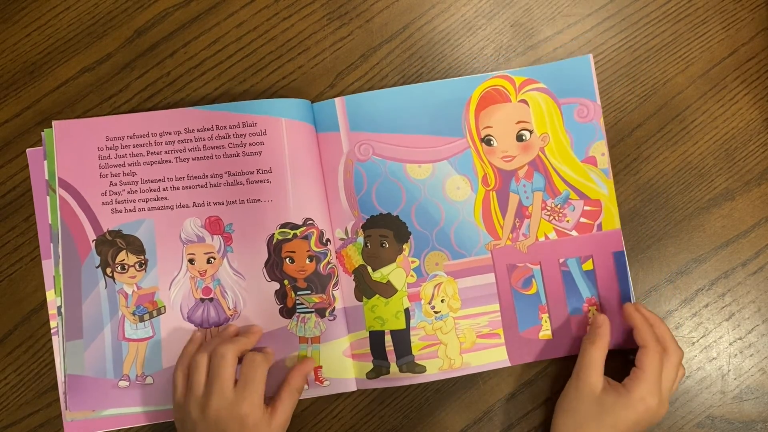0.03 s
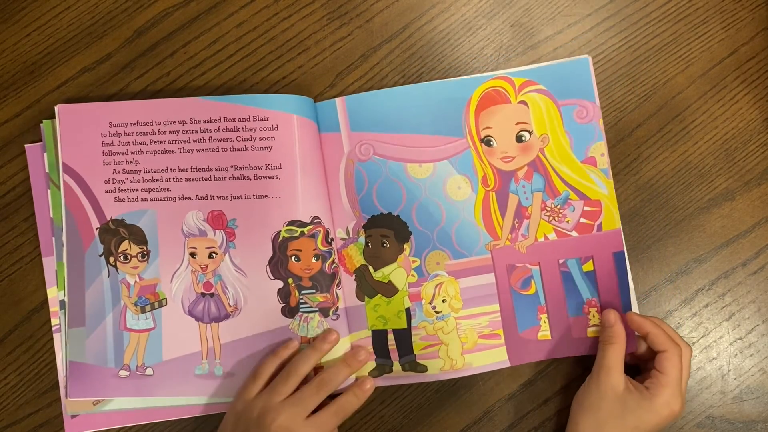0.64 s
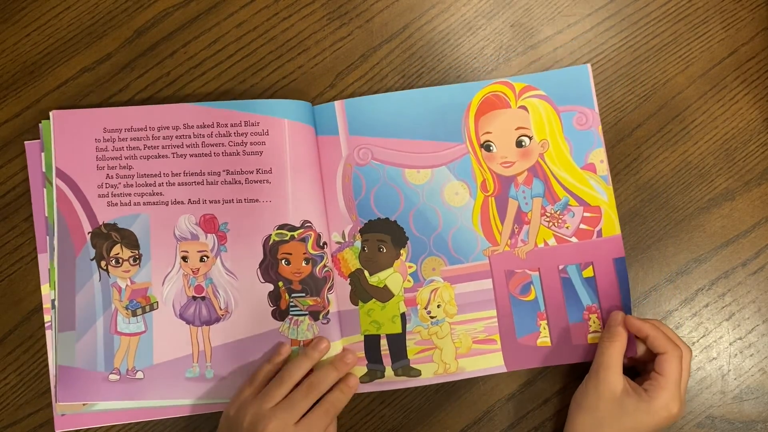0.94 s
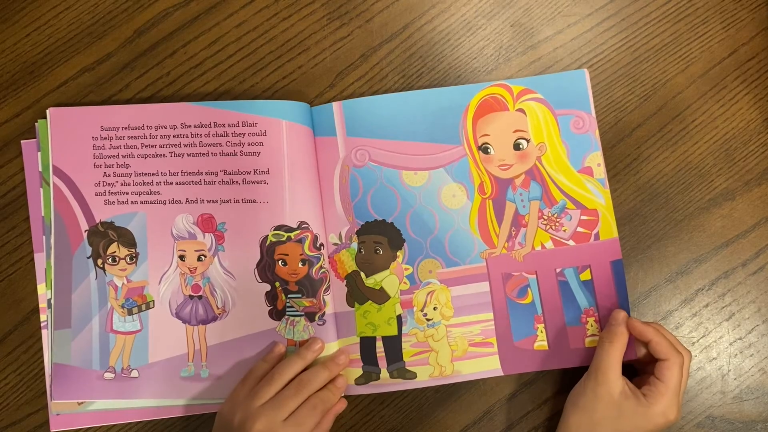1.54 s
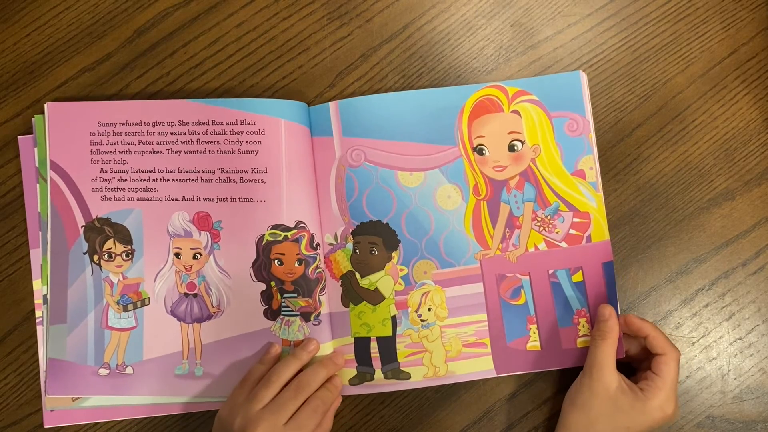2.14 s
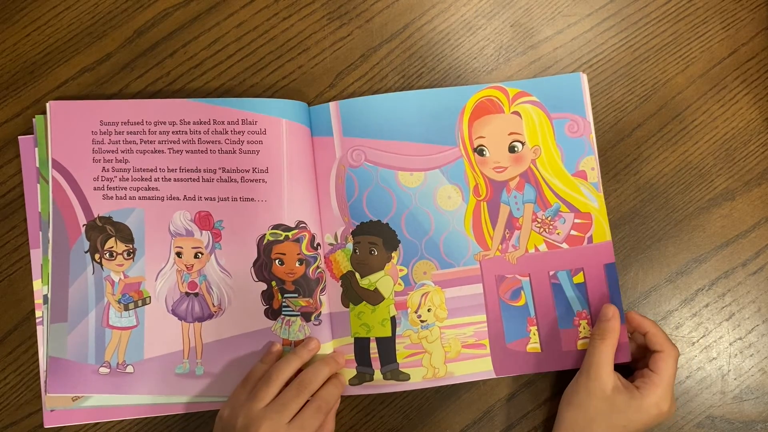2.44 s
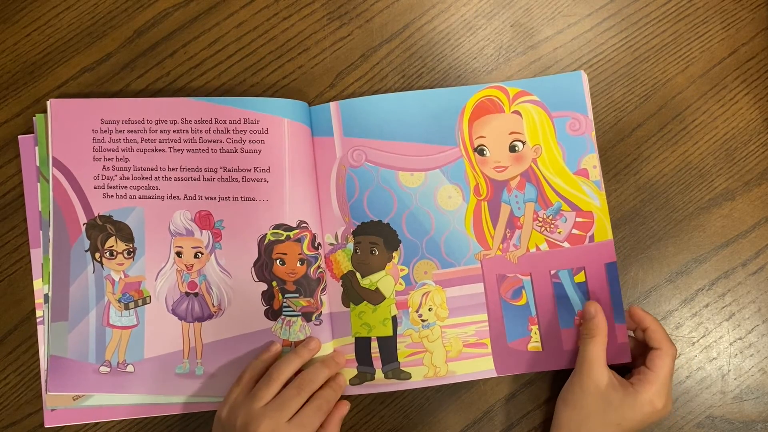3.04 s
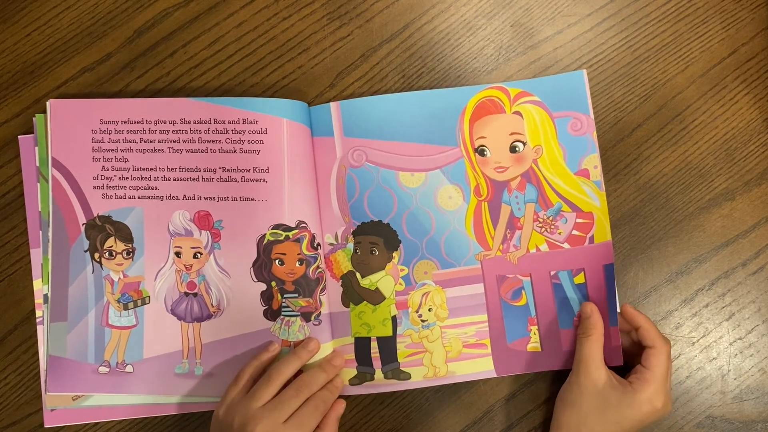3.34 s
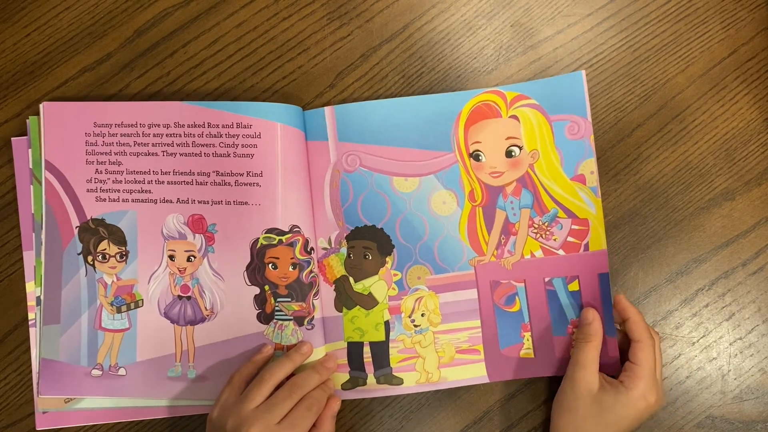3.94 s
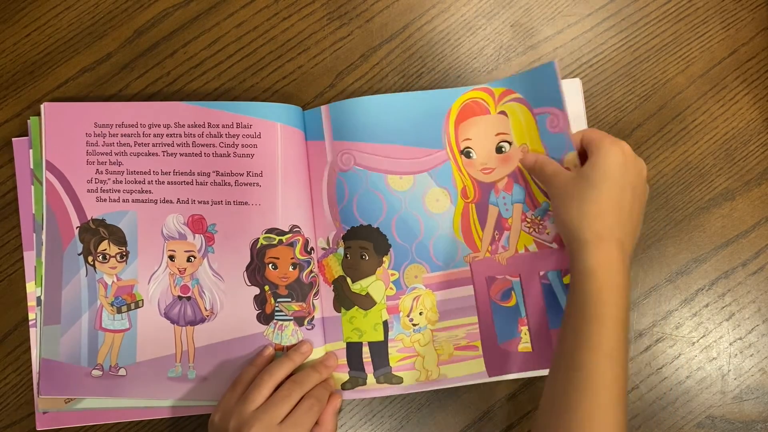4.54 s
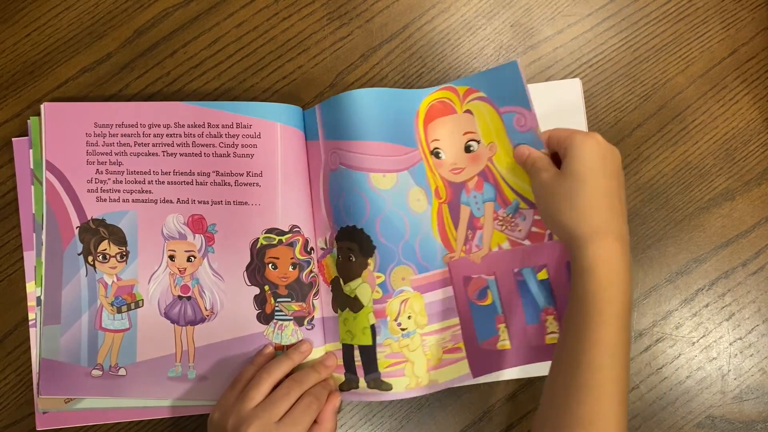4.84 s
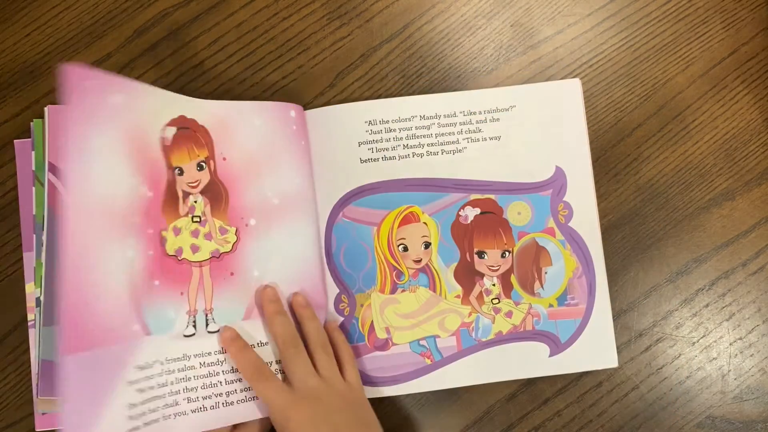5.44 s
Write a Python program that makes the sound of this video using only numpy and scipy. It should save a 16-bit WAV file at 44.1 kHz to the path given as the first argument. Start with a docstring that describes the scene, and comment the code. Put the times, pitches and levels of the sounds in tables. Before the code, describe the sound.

Close to the microphone, fingertips rub lightly on a picture book page and pick at its edge, making faint, scattered ticks and a soft bump. Then paper slides on paper in short hissing pushes, and the stiff sheet crackles, bends and lands with a louder flap and a brief rub. A low, steady indoor hum lies underneath.

```python
"""A quiet, humming room, with a stereo camera close above a picture book on a wooden table.
Fingers brush the stiff page and catch on its corner in tiny stick-slip ticks. The hand slides under
the sheet, paper hissing on paper; the page snaps and buckles as it is lifted, flaps over and is
smoothed down. The microphones hear it directly, off the table and book, and faintly off the walls."""
import sys
import numpy as np
from scipy import signal
from scipy.fft import rfft, irfft, next_fast_len
from scipy.io import wavfile
from scipy.ndimage import uniform_filter1d, map_coordinates

SR = 44100
rng = np.random.default_rng(int(sys.argv[2]) if len(sys.argv) > 2 else 0)


def unload_wav(signal):
    """Save mono or channel-first audio to the path in sys.argv[1] as 16-bit WAV at rate SR, clipped to [-1, 1]."""
    wavfile.write(
        sys.argv[1],
        SR,
        np.round(np.clip(np.atleast_2d(signal).T, -1, 1) * 32767).astype(np.int16),
    )


N = 246997
T = np.arange(N) / SR
SHORT = T[:SR // 3]  # time axis of one brief sound


def amp(db):
    """Decibels to gain."""
    return 10 ** (np.asarray(db) / 20)


def unit(x):
    """Scale to rms 1."""
    return x / np.sqrt(np.mean(x ** 2) + 1e-20)


def along(points, hz):
    """Read (Hz, value) points on a log axis."""
    f, v = np.transpose(points)
    return np.interp(np.log(hz + 1), np.log(f), v)


def rolloff(ratio, slope=1):
    """A gain near 1 for small ratios, 3 dB down at ratio 1 and falling beyond."""
    return 1 / np.hypot(1, ratio ** slope)


def filtered(x, response):
    """x times a response of frequency."""
    n = x.shape[-1]
    m = next_fast_len(n + 8192)
    return irfft(rfft(x, m) * response(np.fft.rfftfreq(m, 1 / SR)), m)[..., :n]


def coloured(x, spectrum):
    """x shaped by (Hz, dB) points, at rms 1."""
    return unit(filtered(x, lambda hz: amp(along(spectrum, hz))))


def ring(gain, size=2048):
    """The causal impulse response, of energy 1, with this shape over frequency."""
    cepstrum = irfft(np.log(gain(np.fft.rfftfreq(size, 1 / SR)) + 1e-6))
    cepstrum[1:size // 2] *= 2
    cepstrum[size // 2 + 1:] = 0
    impulse = irfft(np.exp(rfft(cepstrum)))
    return impulse / np.linalg.norm(impulse)


def add(track, s, sound):
    """Mix a sound into the track at time s."""
    part = track[max(round(s * SR), 0):][:len(sound)]
    part += sound[:len(part)]


def wobble(rate):
    """A slow random curve, rate knots a second."""
    knots = rng.standard_normal(int(T[-1] * rate) + 2)
    return np.interp(T * rate, np.arange(len(knots)), knots)


def swell(s, rise, hold, fall):
    """A movement speeds up from rest at time s, holds and slows to rest: 0 to 1."""
    return np.interp(T, s + np.cumsum([0, rise, hold, fall]), [0, 1, 1, 0])


def grains(n, rate, spread_db):
    """Fibres that let go at random moments with random strengths, rms 1."""
    count = int(n * rate / SR) + 1
    when, size, side = rng.random((count, 3)).T
    strength = np.sign(side - .5) * amp(spread_db * np.sqrt(12) * size)
    return unit(np.bincount((when * n).astype(int), strength, n))


def patchy(x, depth_db):
    """The sheet keeps changing shape, so its resonances come and go."""
    spectra = signal.stft(x, nperseg=256)[2]
    field = uniform_filter1d(rng.standard_normal(spectra.shape), size=4, axis=0)
    field = unit(uniform_filter1d(field, size=14, axis=1))
    return unit(signal.istft(spectra * amp(depth_db * field), nperseg=256)[1][:len(x)])


def uneven(hz, spacing_hz, depth_db):
    """Random peaks and dips over frequency: paper held a little differently rings differently."""
    return amp(depth_db * map_coordinates(rng.standard_normal(256), [hz / spacing_hz], mode="mirror"))


# Room tone all around the camera. Each row: frequency in Hz, relative level in dB.
ROOM_TONE = [(25, -51), (40, -21), (62, -1.5), (100, -4.5), (135, 8.5), (200, 0.5), (340, 7), (450, 0.5),
             (650, -5.5), (1100, -6.5), (1290, -3.5), (1600, -11), (3000, -17.5), (5500, -25.5),
             (8000, -43.5), (13000, -47)]
# How alike that tone is at the two microphones. Each row: frequency in Hz, left-right correlation.
ROOM_LIKENESS = [(130, 0.99), (270, 0.88), (580, 0.045), (3000, 0.12)]
# An appliance in the room, heard dead centre. Each row: frequency in Hz, level in dB before hum_db.
APPLIANCE_HUM = [(118.4, -71.5), (172.3, -84), (258.4, -77), (360.7, -69), (473.7, -80), (952.8, -84),
                 (1280, -76)]
def room(motion, rest_db=-64.5, swell_db=1, hum_db=-1):
    """Low room noise that swells while the hands move, and a slightly unsteady hum."""
    width = lambda hz: np.tan(np.arccos(np.clip(along(ROOM_LIKENESS, hz), -1, 1)) / 2)
    mid, side = coloured(rng.standard_normal((2, N)), ROOM_TONE)
    side = filtered(side, width)
    air = np.hypot(amp(rest_db), amp(swell_db) * motion) * np.array([mid + side, mid - side])
    drift = lambda: .55 * wobble(4) + 2 * np.pi * rng.random()
    hum = sum(amp(db) * np.sqrt(2) * np.sin(2 * np.pi * hz * T + drift()) for hz, db in APPLIANCE_HUM)
    return air + amp(hum_db) * hum


def table_boom(motion, ring_hz=140, width_hz=7, gain_db=-9):
    """The table booms softly in one low mode under the moving hands."""
    boom = filtered(rng.standard_normal(N), lambda hz: 1 / (1 + ((hz - ring_hz) / width_hz) ** 2))
    return amp(gain_db) * motion * unit(boom)


def echoes(x, t60_of, length):
    """Diffuse reflections at each microphone, each frequency dying at its own speed."""
    hz, t, spectra = signal.stft(rng.standard_normal((2, length)), SR, nperseg=128)
    tail = signal.istft(spectra * amp(-60 * t / t60_of(hz)[:, None]), SR, nperseg=128)[1]
    tail /= np.linalg.norm(tail, axis=1, keepdims=True)
    tail = np.pad(tail, ((0, 0), (SR // 1000, 0)))  # 1 ms behind the direct sound
    return signal.oaconvolve(x[None], tail, axes=1)[:, :N]


# The book, close below the two microphones. Each row: frequency in Hz, left's lead in radians.
MIC_PHASE = [(300, 0), (950, -1.6), (1800, 0), (2900, 2.2), (3900, .8), (5200, .3), (7000, 3), (7900, 3.3),
             (10000, 6.2), (11200, 6.5), (13000, 9.3)]
# Its place in the stereo picture. Each row: frequency in Hz, left minus right in dB.
MIC_BALANCE = [(350, 1), (600, -6), (1140, -10), (2050, -2), (3700, -2), (6000, 0)]
# Tone of the near and far reflections as picked up, with a dip near 7 kHz.
# Each row: frequency in Hz, gain in dB.
NEAR_COLOUR = [(200, -30), (450, 4), (900, 4), (2800, -1.5), (5000, 0), (7000, -19), (12000, 1)]
FAR_COLOUR = [(150, 12), (450, -5), (1500, 7), (5300, 3), (7000, -34), (12000, -10)]
# The room's short decay. Each row: frequency in Hz, time to fall 60 dB (t60) in seconds.
WALL_DECAY = [(200, 0.13), (1500, 0.16), (5000, 0.2), (12000, 0.12)]
def at_microphones(x, scatter_db, walls_db=-13, near_t60=.035):
    """Paper sound in stereo: direct, scattered by table and book, and returned by the walls."""
    half = np.array([[.5], [-.5]])
    direct = filtered(x, lambda hz: np.exp(1j * half * along(MIC_PHASE, hz)))
    scattered = amp(scatter_db) * filtered(x, lambda hz: amp(along(NEAR_COLOUR, hz)))
    pose = 2 * np.pi * 4 * T  # hand and page keep moving, so the short paths keep changing
    near = sum(echoes(scattered * share, lambda hz: np.full(len(hz), near_t60), SR // 20)
               for share in (np.cos(pose), np.sin(pose)))
    far = filtered(x, lambda hz: amp(along(FAR_COLOUR, hz)))
    far = amp(walls_db) * echoes(far, lambda hz: along(WALL_DECAY, hz), SR // 2)
    return filtered(direct + near + far, lambda hz: amp(half * along(MIC_BALANCE, hz)))


# Rubbed paper from close up: its hiss, the fizz on top and the body of the sheet below.
# Each row: frequency in Hz, relative level in dB.
PAPER_HISS = [(800, -34), (2000, -18), (3000, -3), (4200, -2), (5700, 4), (7000, -0.5), (8500, -3),
              (9900, -18.5), (11000, -53), (14000, -58)]
PAPER_FIZZ = [(5000, -20), (7000, -6), (8500, 8), (9900, 2), (11000, -5), (12300, -10.5), (14000, -7.5)]
PAPER_BODY = [(150, -74), (350, -6.5), (650, -15), (1200, -13), (1700, -0.5), (2150, 5), (2800, 2.5),
              (4500, -17), (9000, -57)]
FIZZ_GROWS = 1.48  # dB for each dB of hiss: faster sliding is brighter
def friction(hiss, fizz, body, rate, spread_db, flutter_db):
    """Sliding paper: dense fibre grains hiss and shake the sheet, under an uneven pressure."""
    pressure = amp(flutter_db * (wobble(70) + wobble(25)))
    rub = lambda spectrum: coloured(patchy(grains(N, rate, spread_db), depth_db=3.5), spectrum)
    return pressure * (hiss * rub(PAPER_HISS) + fizz * rub(PAPER_FIZZ) + body * rub(PAPER_BODY))


# Hands shifting on the book. Each row: start in seconds, hold in seconds, strength in dB.
HAND_SHIFTS = [(-.12, 0.12, -60), (0.252, 0.46, -58.3), (2.29, 0.023, -59), (3.374, 0.3, -66.5),
               (3.748, 1.7, -57.5)]
def hand_motion(rise_s=0.13, fall_s=0.33):
    """The strength of all shifts of the hands, summed in power, as a gain."""
    return np.sqrt(sum((amp(db) * swell(s, rise_s, hold, fall_s)) ** 2 for s, hold, db in HAND_SHIFTS))


def hand_rub(motion, hiss_db=-73, fizz_db=-84, body_db=-73):
    """Shifting hands rub the open page faintly; only the firmest shifts are bright."""
    drive = motion / motion.max()
    return friction(amp(hiss_db) * drive, amp(fizz_db) * drive ** FIZZ_GROWS, amp(body_db) * drive,
                    rate=6000, spread_db=10, flutter_db=3.5)


# The page's free corner, faint even this close.
# Each row: start in seconds, level in dB, pitch in Hz, t60 in seconds.
CORNER_TWANGS = [(2.272, -49, 2710, 0.052), (2.966, -60, 2030, 0.15), (3.421, -52, 2144, 0.098),
                 (3.469, -49, 2310, 0.083)]
def corner_twangs(attack_s=0.0023, waver_rad=0.71):
    """Let go, the corner springs back and rings with one short, slightly unsteady note."""
    track = np.zeros(N)
    for s, db, hz, t60 in CORNER_TWANGS:
        phase = 2 * np.pi * hz * SHORT + waver_rad * wobble(300)[:len(SHORT)]
        envelope = amp(db - 60 * SHORT / t60) * (1 - np.exp(-SHORT / attack_s))
        add(track, s, envelope * np.sin(phase))
    return track


# The stiff sheet as it flexes. Each row: frequency in Hz, relative level in dB.
SHEET_COLOUR = [(80, -7), (300, 8), (640, 5.5), (1150, 5), (1600, 4.5), (2500, 9.5), (6000, 11.5),
                (12000, 16)]
def shudder(t60, bright_hz, ring_hz, q, rate=2000, snap_db=16, soft_s=0.31):
    """The sheet snaps through, then shudders in smaller snaps."""
    mode = lambda r: r ** 2 / np.hypot(1 - r ** 2, r / q)  # a bend radiates little below its own ring
    bend = ring(lambda hz: amp(along(SHEET_COLOUR, hz)) * mode(hz / ring_hz) * rolloff(hz / bright_hz, 3))
    fade = amp(-60 * SHORT / t60)
    sound = signal.fftconvolve(grains(len(SHORT), rate, spread_db=2) * fade, bend)
    sound *= np.linalg.norm(fade) / np.linalg.norm(sound)  # the shudder releases a set energy
    sound[:len(bend)] += amp(snap_db) / (1 + t60 / soft_s) * bend  # a slow, soft bend has little snap
    return sound


# A finger bumps the hollow book. Each row: start in seconds, level in dB, t60 in seconds, resonance Q.
FINGER_BUMPS = [(1.058, -61, 0.21, 2.2), (1.835, -62, 0.39, 2.2), (3.43, -57.5, 0.24, 5.2),
                (3.449, -47, 0.18, 7)]
def finger_bumps(cover_db=-8.5):
    """The arched page answers each bump with a hollow note, the cover board with a woody one above."""
    track = np.zeros(N)
    for s, db, t60, q in FINGER_BUMPS:
        page = shudder(t60, bright_hz=900, ring_hz=865, q=q, snap_db=27.5)
        cover = shudder(t60, bright_hz=2320, ring_hz=2220, q=q)
        add(track, s, amp(db) * (page + amp(cover_db) * cover))
    return track


# The bright colour of the fingertip ticks as the microphones hear them.
# Each row: frequency in Hz, relative level in dB.
TICK_COLOUR = [(400, -31), (1500, -14), (2600, -3), (3100, -12), (3800, 4), (4300, 1.5), (5400, 15),
               (6800, 2), (8600, 5.5), (9500, -25), (13000, -33)]
# A fingertip catches on the page edge, just under the microphones.
# Each row: start in seconds, level in dB, length in seconds, pitch in Hz.
EDGE_TICKS = [(0.359, -47.5, 0.0071, 5270), (0.376, -45.5, 0.011, 5200), (0.921, -58.5, 0.006, 5470),
              (1.423, -51, 0.012, 5730), (1.931, -54, 0.0077, 5570), (2.1442, -47.5, 0.0087, 5240),
              (2.1922, -43, 0.0074, 4800), (2.269, -42, 0.013, 4900), (2.33, -43, 0.012, 5150),
              (2.375, -44, 0.013, 4830), (2.393, -47.5, 0.025, 4760), (2.965, -49, 0.033, 5600),
              (3.85, -46.5, .008, 4400)]
def edge_ticks(slip_rate=620, width_hz=1900, trail_db=-20, trail_t60=0.28, count=40):
    """The fingertip sticks and slips in a nearly regular, fading train; no two slips sound alike."""
    track = np.zeros(N)
    for s, db, length, pitch_hz in EDGE_TICKS:
        gaps = rng.uniform(1.0, 1.7, count) / slip_rate
        when = np.cumsum(gaps) - gaps[0]
        grip = amp(-4 * when / length) * np.clip(1 + (length - when) * slip_rate / 2, 0, 1) ** 2
        trail = amp(trail_db - 60 * when / trail_t60)
        sizes = amp(2.4 * rng.standard_normal(count)) * np.maximum(grip, trail) * np.sqrt(SR / slip_rate)
        colour = lambda hz: amp(along(TICK_COLOUR, hz)) * rolloff(2 * (hz - pitch_hz) / width_hz)
        held = ring(lambda hz: uneven(hz, spacing_hz=258, depth_db=4), size=512)  # each catch grips anew
        for delay, size in zip(when, sizes):
            tick = ring(lambda hz: colour(hz) * uneven(hz, spacing_hz=387, depth_db=4), size=512)
            slip = np.convolve(tick, held)
            add(track, s + delay, amp(db) * size * slip / np.linalg.norm(slip))
    return track


# Skin on coated paper. Each row: frequency in Hz, relative level in dB.
SKIN_COLOUR = [(800, -53), (2000, -20), (3000, -1), (4200, -6.5), (5700, 0.5), (7000, -0.5), (9000, -0.5),
               (10500, -21), (12000, -22), (14000, -28)]
# Short brushes across the page, heard close. Each row: start in seconds, level in dB, rise and t60
# in seconds, sheet gain in dB, treble cutoff in Hz, pitch in Hz.
FINGER_BRUSHES = [(.102, -57.5, .0038, 0.15, -20, 11400, 6400),
                  (0.391, -42, 0.0017, 0.063, -28, 12600, 5100), (.44, -50, 0.013, 0.43, -29, 8450, 4370),
                  (.48, -42.5, 0.031, 0.23, -14, 11900, 4040), (.575, -43.5, 0.021, 0.1, -11, 9900, 3530),
                  (.641, -58.5, 0.002, 0.03, 0, 12000, 5300), (.734, -56, 0.014, 0.087, -4.5, 9500, 5100),
                  (0.819, -60.5, 0.0069, 0.17, -22, 12000, 9050),
                  (1.043, -63.5, 0.0027, 0.25, -6, 9400, 5230), (1.819, -46, 0.023, 0.091, -13, 9700, 5160),
                  (2.815, -75, .012, .12, 1, 10500, 5500), (3.419, -48.5, 0.006, 0.31, -7, 8850, 5150),
                  (3.703, -57.5, .003, 0.11, -10, 7000, 5170), (3.717, -54.5, .003, 0.072, -9, 11500, 5200),
                  (3.728, -46, 0.024, 0.31, -7, 10000, 4700), (3.972, -55, 0.0091, 0.18, -10, 10000, 8650),
                  (4.576, -39.5, 0.0039, 0.11, -10.5, 11700, 5370),
                  (4.989, -33.5, 0.011, 0.13, -15, 12000, 5700),
                  (5.246, -47.5, 0.0022, 0.19, 0.5, 12000, 5100),
                  (5.376, -36, 0.007, .05, -13.5, 12000, 6200)]
def finger_brushes(width_hz=700, focus=3.4):
    """A quick stroke swells and dies away, with its own share of the sheet's lower rustle."""
    track, n = np.zeros(N), len(SHORT)
    for s, db, rise, t60, sheet_db, bright_hz, pitch_hz in FINGER_BRUSHES:
        peak = lambda hz: 1 + focus * rolloff((hz - pitch_hz) / width_hz)
        stroke = np.minimum(SHORT / rise, 1) * amp(-60 * np.maximum(SHORT - rise, 0) / t60)
        skin = coloured(patchy(grains(n, rate=3000, spread_db=-1), depth_db=4.5), SKIN_COLOUR)
        skin = unit(filtered(skin, lambda hz: peak(hz) * rolloff(hz / bright_hz, 10)))
        sheet = coloured(patchy(grains(n, rate=2500, spread_db=2), depth_db=5.5), PAPER_BODY)
        # a fingertip is too small to drive the long bends
        sheet = filtered(sheet, lambda hz: rolloff(800 / (hz + 1), 2))
        add(track, s, amp(db) * stroke * (skin + amp(sheet_db) * sheet))
    return track


# A finger runs along the page edge, which sings thinly or rasps. Each row: start and length
# in seconds, level in dB, then first pitch, last pitch and width in Hz.
EDGE_GLIDES = [(0.257, 0.23, -57.5, 6240, 5030, 460), (0.419, .15, -61, 4515, 3300, 500),
               (0.465, 0.068, -55, 9800, 10540, 420), (3.436, 0.07, -58.5, 5400, 5220, 400),
               (3.481, 0.75, -67, 5190, 5210, 170), (3.597, 0.34, -67, 4430, 4090, 170),
               (3.697, .26, -54.5, 5250, 5340, 300), (3.758, .13, -56, 4030, 4300, 450),
               (3.959, 0.15, -49, 5450, 5010, 450), (4.306, 0.11, -43, 4200, 3700, 700),
               (4.584, 0.115, -63, 5280, 5150, 200), (4.625, 0.13, -52, 5000, 5110, 240),
               (4.797, 0.13, -37, 5740, 5840, 595), (5.088, 0.073, -46, 5920, 5880, 430),
               (5.41, 0.12, -43, 5580, 5660, 526)]
def edge_glides(rough_db=2.5):
    """The page edge sings in one scratchy resonance that swells, fades and moves with the finger."""
    track = np.zeros(N)
    for s, length, db, first_hz, last_hz, width_hz in EDGE_GLIDES:
        noise = filtered(rng.standard_normal((2, SR)), lambda hz: 1 / (1 + (hz / width_hz) ** 2))
        grip = amp(rough_db * unit(uniform_filter1d(rng.standard_normal(SR), size=200)))
        phase = 2 * np.pi * np.cumsum(np.interp(T[:SR], [0, length], [first_hz, last_hz])) / SR
        resonance = noise[0] * np.cos(phase) + noise[1] * np.sin(phase)
        stroke = swell(0, length / 3, length / 3, length / 3)[:SR]
        add(track, s, amp(db) * stroke * unit(grip * resonance))
    return track


# One paper fibre cracking. Each row: frequency in Hz, relative level in dB.
FIBRE_COLOUR = [(600, -41), (1800, 8), (4000, -15), (6500, 24), (10000, -32), (13000, -49)]
def crinkles(hiss, crinkle_db=-12):
    """Single fibres crack in the bending sheet, harder as it slides faster."""
    cracks = grains(N, rate=45, spread_db=4)
    fibre = ring(lambda hz: amp(along(FIBRE_COLOUR, hz)))
    return hiss * amp(crinkle_db) * signal.fftconvolve(cracks, fibre)[:N]


# Close under the camera the hand pushes in jerks beneath the page, grips, lifts, swings and smooths it.
# Each row: start, rise, hold and fall in seconds, hiss level in dB, then sheet and fizz in dB against it.
PAGE_SLIDES = [(3.981, 0.095, 0.026, .06, -39.5, -15.5, -19), (4.088, 0.054, 0.026, 0.043, -40.5, -9.5, -9),
               (4.161, 0.039, 0.027, .05, -38, -10.5, -13), (4.223, 0.048, .04, 0.059, -40, -20, -11),
               (4.287, 0.036, 0.038, 0.079, -39.5, -8.5, -10), (4.385, 0.062, 0.059, 0.024, -43, -4.5, -10),
               (4.504, 0.042, 0.057, 0.049, -53, -4, -26), (4.677, 0.03, 0.083, 0.072, -47, 1, -12),
               (4.771, 0.021, 0.11, 0.023, -40.5, -5.5, -6), (4.913, 0.086, 0.016, 0.058, -39, -4.5, 0),
               (5.033, 0.04, 0.044, 0.073, -42.5, -6.5, -10),
               (5.219, 0.081, 0.089, 0.058, -40.5, -10.5, -5.5), (5.388, 0.057, 0.13, .1, -42, -11.5, -4.5)]
def page_slides(speed_power=1.1):
    """Paper slides on paper; its speed drives the hiss, fizz, sheet sound and crinkles."""
    hiss, fizz, body = np.zeros((3, N))
    for s, rise, hold, fall, db, sheet_db, fizz_db in PAGE_SLIDES:
        drive = swell(s, rise, hold, fall) ** speed_power
        hiss += amp(db) * drive
        fizz += amp(db + fizz_db) * drive ** FIZZ_GROWS
        body += amp(db + sheet_db) * drive
    return friction(hiss, fizz, body, rate=4000, spread_db=2, flutter_db=.9) + crinkles(hiss)


# The page buckling below the microphones.
# Each row: start in seconds, level in dB, t60 in seconds, treble cutoff in Hz, ring of the bend in Hz.
PAGE_BUCKLES = [(.511, -49.5, 0.11, 2300, 1770), (.592, -55, .12, 1300, 900),
                (4.085, -35, 0.017, 2400, 1780), (4.485, -37, 0.048, 2580, 1630),
                (4.72, -48, 0.5, 2000, 1040), (4.773, -27, 0.022, 3440, 1160),
                (4.785, -44.5, 0.42, 2300, 1250), (4.884, -36, 0.026, 1810, 1080),
                (4.995, -32, 0.14, 1890, 1700), (5.032, -32, 0.14, 2260, 850),
                (5.059, -28.5, 0.067, 1720, 780), (5.066, -31.5, 0.2, 1660, 676),
                (5.111, -36, 0.17, 1717, 475), (5.247, -47, .5, 800, 370), (5.269, -35, 0.2, 1950, 400),
                (5.474, -41, .08, 1800, 900), (5.48, -25, 0.16, 2080, 1050), (5.484, -25, 0.15, 1770, 860),
                (5.486, -36, 0.22, 520, 410), (5.502, -26, 0.14, 1700, 820), (5.527, -31, 0.2, 1500, 705)]
def page_buckles(hz_per_q=636):
    """The lifted page gives way, bend after bend, and lands; a tighter bend rings higher and clearer."""
    track = np.zeros(N)
    for s, db, t60, bright_hz, ring_hz in PAGE_BUCKLES:
        add(track, s, amp(db) * shudder(t60, bright_hz, ring_hz, q=ring_hz / hz_per_q))
    return track


# Dry cracks from the raised sheet, right in front of the microphones.
# Each row: start in seconds, peak at the page in dB, low and high cutoff in Hz.
PAGE_SNAPS = [(0.108, -55, 4000, 9500), (0.393, -30, 2700, 6200), (0.3965, -34, 3000, 7000),
              (.399, -28.5, 3800, 7000), (0.5101, -36, 1610, 2500), (.518, -35, 3000, 7000),
              (0.593, -33.5, 2800, 4400), (0.6008, -35, 2820, 8000), (2.966, -29, 5200, 5000),
              (3.735, -40, 1800, 10900), (4.044, -38, 4070, 6500), (4.162, -25, 3500, 7000),
              (4.198, -34, 1700, 5950), (4.222, -28, 1400, 6500), (4.359, -22, 2800, 6000),
              (4.7273, -28, 1200, 12500), (4.74, -36, 1500, 12500), (4.772, -13, 850, 6960),
              (4.856, -21.5, 700, 2410), (4.862, -28, 2000, 9000), (4.886, -29, 1200, 6000),
              (5.0, -28, 1800, 7000), (5.036, -20, 2700, 3700), (5.0595, -23.5, 600, 1800),
              (5.087, -28.5, 2500, 10000), (5.247, -32, 1500, 12000), (5.383, -30, 3500, 9500),
              (5.4855, -14, 980, 2570), (5.504, -18.5, 2200, 5000)]
def page_snaps(delay_at_1khz_s=0.001186):
    """A kink pops through; the crack crosses the sheet as a bending wave, so the treble arrives first."""
    track = np.zeros(N)
    for s, db, low_hz, high_hz in PAGE_SNAPS:
        band = lambda hz: rolloff(low_hz / (hz + 1), 3) * rolloff(hz / high_hz, 5)
        crack = ring(lambda hz: band(hz) * uneven(hz, spacing_hz=660, depth_db=3.5))
        crack = filtered(crack, lambda hz: np.exp(-4j * np.pi * delay_at_1khz_s * np.sqrt(1000 * hz)))
        add(track, s, amp(db) * crack / np.abs(crack).max())
    return track


def scene():
    """Hands and page close up, over the tone of the room."""
    motion = hand_motion()
    paper = hand_rub(motion) + page_slides() + edge_glides() + finger_brushes()
    paper += edge_ticks() + corner_twangs() + finger_bumps() + page_buckles()
    paper = at_microphones(paper, scatter_db=-3)
    snaps = at_microphones(page_snaps(), scatter_db=-7)  # the raised sheet is clear of the table
    return paper + snaps + table_boom(motion) + room(motion)


def record(dry, top_hz=12500):
    """The camera cuts off steeply above its band limit."""
    return filtered(dry, lambda hz: rolloff(hz / top_hz, 40))


dry = scene()
out = record(dry)
unload_wav(out)
```